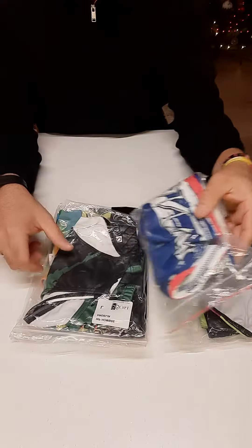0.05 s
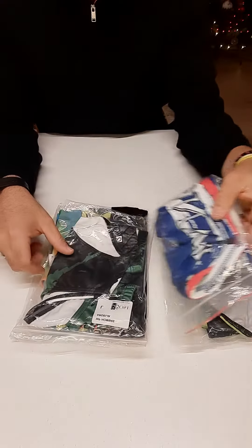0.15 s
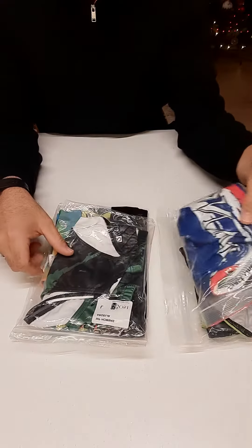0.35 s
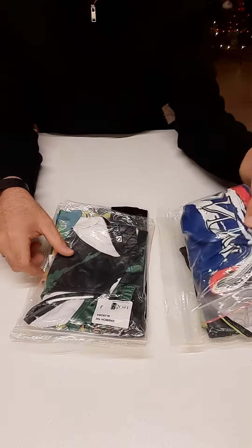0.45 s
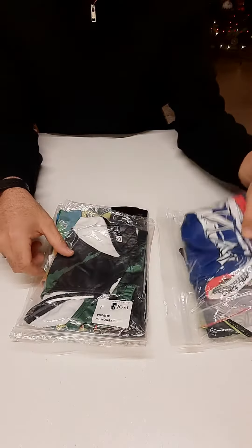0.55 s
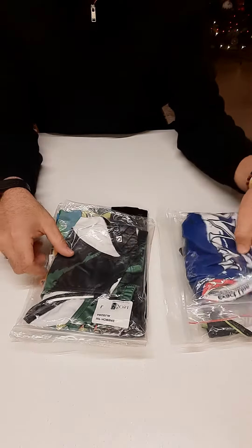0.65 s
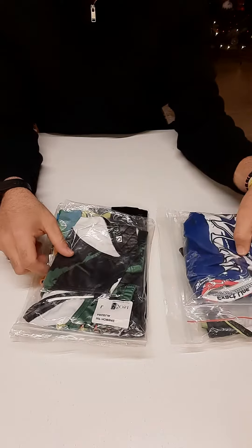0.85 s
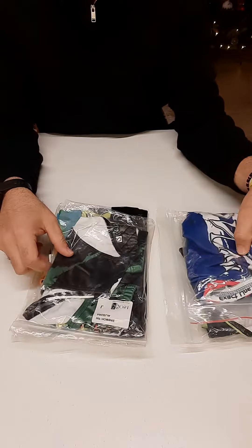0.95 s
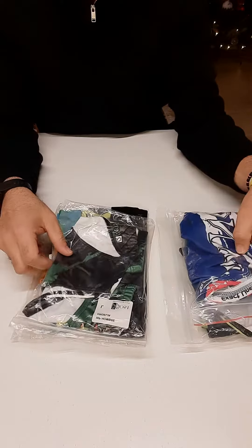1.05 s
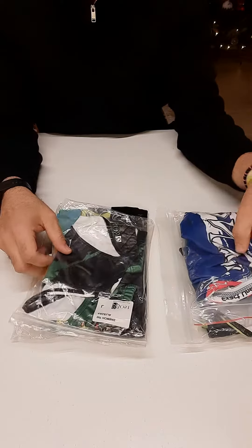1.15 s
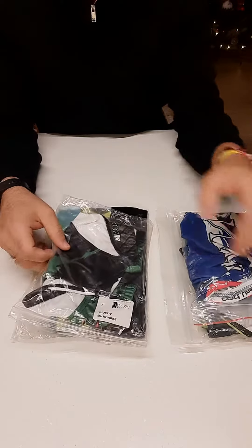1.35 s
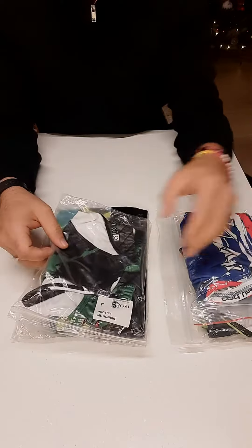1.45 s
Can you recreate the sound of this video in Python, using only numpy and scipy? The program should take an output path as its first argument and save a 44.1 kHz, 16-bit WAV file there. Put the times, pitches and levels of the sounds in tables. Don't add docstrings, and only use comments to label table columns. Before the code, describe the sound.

Plastic packaging rustles, pops and snaps, with one soft thud on a tabletop in a quiet room.

```python
import sys
import numpy as np
from scipy import signal
from scipy.fft import rfft, irfft
from scipy.io import wavfile

SR = 44100
rng = np.random.default_rng(int(sys.argv[2]) if len(sys.argv) > 2 else 0)


def to_wav(sig):
    pcm = np.clip(np.atleast_2d(sig), -1, 1) * 32767
    pcm = np.round(pcm).astype(np.int16)
    wavfile.write(sys.argv[1], SR, pcm.T)


def field_ratio(decibels):
    return 10 ** (np.asarray(decibels, dtype=float) / 20)


N = 66150


def in_time(rows):
    s, *columns = np.transpose(rows)
    return [np.interp(np.arange(N) / SR, s, c) for c in columns]


def at_hz(points, hz):
    table_hz, values = np.transpose(points)
    return np.interp(np.log(hz), np.log(table_hz), values)


def rms_one(x):
    return x / np.sqrt(np.mean(x ** 2) + 1e-20)


def drift(rate_hz):
    r = np.exp(-2 * np.pi * rate_hz / SR)
    noise = rng.standard_normal(N + SR)
    return rms_one(signal.lfilter([1], [1, -2 * r, r * r], noise)[SR:])


def highpass(x, order, hz):
    return signal.sosfilt(signal.butter(order, hz, "high", fs=SR, output="sos"), x)


def ring(clicks, hz, t60_s):
    r = field_ratio(-60 / (t60_s * SR))
    w = 2 * np.pi * hz / SR
    return signal.lfilter([0, np.sin(w)], [1, -2 * r * np.cos(w), r * r], clicks + 1e-18)


def add(out, s, db, sound):
    size = np.abs(sound.mean(0))
    i = max(int(s * SR) - np.argmax(size), 0)
    out[:, i:i + sound.shape[1]] += field_ratio(db) * sound / size.max()


# time in s, peak in dB, pitch in Hz.
POPS_CARRIED = [(0.0329, -48.5, 930), (0.0605, -63, 1201), (0.0867, -43.4, 1280), (0.0992, -46.4, 1880),
                (0.1062, -42.5, 1370), (0.1267, -42.5, 1290), (0.1363, -38.5, 2780), (0.1473, -48.5, 1350),
                (0.165, -46, 1750), (0.1806, -40.5, 2740), (0.2032, -36.9, 2100), (0.2093, -37, 1870),
                (0.2163, -29.5, 2520), (0.2876, -29.5, 2440), (0.2998, -43.8, 2590), (0.3081, -46, 2200),
                (0.3422, -43, 1690), (0.3677, -37.5, 2330), (0.3837, -30, 2206), (0.432, -43.5, 3600),
                (0.4775, -39, 1840)]
POPS_SET_DOWN = [(0.5478, -40, 990), (0.5627, -33.5, 1940), (0.5736, -37, 1000), (0.5881, -37.5, 785),
                 (0.6009, -35, 1060), (0.6093, -35.7, 2600), (0.625, -32.5, 1050), (0.6397, -40, 980),
                 (0.6492, -42, 1010), (0.6577, -23.5, 914), (0.6719, -37, 1220), (0.6868, -34, 1650),
                 (0.7048, -27, 1180), (0.7236, -37, 740), (0.7718, -44, 1240)]
POPS_SECOND_BAG = [(0.8366, -39.5, 1400), (0.8578, -34.5, 3790), (0.9154, -45, 3600), (0.9438, -55, 1540),
                   (0.9685, -46.5, 1160), (0.9933, -39.1, 1610), (1.0037, -37.5, 2340),
                   (1.0061, -33.5, 2210), (1.0507, -44.5, 1600), (1.1053, -42.5, 2310), (1.1198, -40, 770),
                   (1.1292, -44, 2060), (1.1451, -39.5, 2740), (1.163, -40, 1190), (1.1817, -52, 1220),
                   (1.203, -44, 2120), (1.3277, -52.5, 2220), (1.347, -47, 2800), (1.4572, -49.5, 1920),
                   (1.4711, -54, 2970)]
POP_CYCLES, POP_DB, POP_ROUGH_DB, POP_PAN_DB = 3.4, 0.56, -8.5, 4.5


def pops(rows):
    out = np.zeros((2, N + SR))
    t = np.arange(400) / SR
    shakes = rng.standard_normal((len(rows), len(t)))
    for (s, db, hz), shake in zip(rows, shakes):
        push = field_ratio(POP_ROUGH_DB) * shake * np.exp(-t * hz / 2)
        push[:int(SR / hz / 5) + 1] -= 1
        sound = highpass(ring(push, hz, POP_CYCLES / hz), 1, hz / 2)
        pan_db = POP_PAN_DB + shake[-1]
        add(out, s, db + POP_DB, sound * field_ratio(pan_db * np.array([[.5], [-.5]])))
    return out[:, :N]


# time in s, peak in dB, centre in Hz, length in ms.
CRACKS_FIRST_BAG = [(0.0314, -54, 6800, 0.82), (0.0596, -51.5, 6840, 0.25), (0.11, -53.5, 6740, 0.75),
                    (0.131, -49, 6350, 0.81), (0.1477, -56, 6700, 1.0), (0.179, -42, 6700, 0.52),
                    (0.216, -28.5, 10000, 0.27), (0.2873, -45, 6000, 0.3), (0.2949, -47.3, 6640, 0.39),
                    (0.3081, -50, 7220, 0.28), (0.3676, -40.5, 5890, 0.34), (0.3837, -32.5, 6700, 0.21),
                    (0.4321, -41.5, 5000, 0.34), (0.5466, -38, 5840, 0.39), (0.5605, -49, 6500, 0.38),
                    (0.5624, -28.5, 5600, 0.45), (0.6551, -35, 6600, 0.13), (0.657, -20.5, 10540, 0.74),
                    (0.6638, -28.5, 11800, 0.73), (0.6739, -33, 6890, 0.61), (0.6876, -34.5, 6170, 1)]
CRACKS_SECOND_BAG = [(0.8366, -55.5, 6650, 1.7), (0.8577, -44, 4200, 0.93), (0.9146, -49, 5130, 0.37),
                     (0.9332, -48, 5550, 0.23), (0.9685, -48, 5570, 0.42), (0.9781, -57, 6930, 0.45),
                     (0.9927, -44.5, 6640, 1.2), (0.9967, -42.5, 7330, 0.72), (1.0035, -26, 10300, 0.97),
                     (1.1055, -53, 5900, 0.7), (1.1166, -38, 9500, 0.32), (1.1451, -34, 5370, 0.94),
                     (1.2029, -37, 11100, 0.22), (1.3278, -51.5, 6220, 0.45), (1.3472, -45, 9200, 0.41),
                     (1.4572, -50, 6740, 0.16), (1.4711, -45.5, 5300, 0.16)]
CRACK_OCTAVES, CRACK_DB, CRACK_SIDE = .7, 2.57, .6
SCATTER_DB, SCATTER_RISE = -11, 0.95


def cracks(rows):
    out = np.zeros((2, N + SR))
    t = (np.arange(500) - 150) / SR
    noises = rng.standard_normal((len(rows), 3, len(t)))
    for (s, db, hz, ms), noise in zip(rows, noises):
        edges_hz = np.clip(hz * 2 ** (CRACK_OCTAVES * np.array([-1, 1])), 500, .45 * SR)
        band = signal.butter(2, edges_hz, "band", fs=SR, output="sos")
        u = t / (max(ms, .1) / 1000)
        envelope = np.exp(-np.where(u < 0, -u / SCATTER_RISE, u))
        burst = field_ratio(SCATTER_DB) * (noise[0] + CRACK_SIDE * noise[1:]) * envelope
        burst[:, 150] += 1
        add(out, s, db + CRACK_DB, signal.sosfilt(band, burst))
    return out[:, :N]


# time in s, crinkle level in dB, brightness in dB.
HANDLING = [(0.025, -80, -17), (.05, -58, -9), (.12, -61.5, 6), (.2, -57, -6.5), (.4, -60.5, 6),
            (.52, -62, -11.5), (.56, -48, -5), (.645, -38.5, -9), (.665, -45, 8), (.72, -47, -2.5),
            (.79, -56.5, -5.5), (.95, -59, -6), (1.0, -50.5, -1), (1.07, -58, 2), (1.14, -53.5, -5),
            (1.22, -61, 0), (1.3, -73, 4.5), (1.5, -69, 10)]
# frequency in Hz, level in dB.
FILM_SPECTRUM = [(300, -66), (600, 4), (1200, 6), (2500, 6), (5000, 10.5), (9000, -8), (15000, -0.5)]
CRINKLES_PER_S, CRINKLE_CYCLES = 4500, 2.8
CRINKLE_SPREAD_DB, CLUMP_DB = 3.5, 4.0


def crinkles():
    level_db, bright_db = in_time(HANDLING)
    sizes = field_ratio(CRINKLE_SPREAD_DB * np.minimum(rng.exponential(1, N), 3.0)) * rng.choice([-1, 1], N)
    born = rng.random(N) < CRINKLES_PER_S * field_ratio(CLUMP_DB * drift(60)) / SR
    pitches_hz = np.geomspace(330, 15000, 24)
    dealt = rng.integers(0, 24, N)
    sides = 1 + .5 * rng.normal(0, 1, N) * np.array([[1], [-1]])
    clicks = sides * sizes * born
    out = 0
    for k, hz in enumerate(pitches_hz):
        tilt_db = bright_db * np.clip(np.log2(hz / 1500) / 2, 0, 1)
        gain = field_ratio(at_hz(FILM_SPECTRUM, hz) + tilt_db) * np.sqrt(hz / 1000)
        out = out + gain * ring(clicks * (dealt == k), hz, CRINKLE_CYCLES / hz)
    return field_ratio(level_db) * rms_one(out)


# frequency in Hz, level in dB, t60 in s.
TABLE_MODES = [(68.8, -2.5, 1), (92.6, -8.5, 1), (146, 6.5, 0.245), (287, -4, 0.2), (296, 4, 0.16),
               (535, 4, 0.21)]
THUD_S, THUD_DB = .657, -53


def thud():
    push = np.zeros(N)
    i = int(THUD_S * SR)
    push[i:i + 100] = np.hanning(100) / 50
    hum = sum(field_ratio(db) * ring(push, hz, t60_s) for hz, db, t60_s in TABLE_MODES)
    return field_ratio(THUD_DB) * highpass(hum, 2, 60)


# frequency in Hz, left-right likeness from 0 to 1.
LIKENESS = [(60, 0.87), (300, 0.89), (640, 0.33), (1400, 0.067), (6000, 0.02)]


def diffuse(size, spectrum):
    hz = np.maximum(np.fft.rfftfreq(size, 1 / SR), 1)
    mid, side = rfft(rng.standard_normal((2, size)))
    alike = np.clip(at_hz(LIKENESS, hz), 0, 1)
    both = np.sqrt(1 + alike) * mid + np.sqrt(1 - alike) * side * np.array([[1], [-1]])
    return hz, both * field_ratio(at_hz(spectrum, hz))


# frequency in Hz, t60 in s.
ROOM_T60 = [(200, 0.27), (1300, 0.44), (3500, 0.47), (9000, 0.41), (16000, 0.35)]
ROOM_DB, ROOM_RISE_S = -4, 0.0041


def room(x):
    t = np.arange(SR) / SR
    hz, both = diffuse(SR, [(20, 0), (20000, 0)])
    tail = 0
    for centre_hz in 40 * 2. ** np.arange(10):
        share = np.clip(1 - np.abs(np.log2(hz / centre_hz)), 0, 1)
        tail = tail + irfft(both * share, SR) * field_ratio(-60 * t / at_hz(ROOM_T60, centre_hz))
    tail = tail * np.clip(t / ROOM_RISE_S, 0, 1)
    tail = tail / np.sqrt(np.sum(tail[0] ** 2))
    return field_ratio(ROOM_DB) * signal.fftconvolve(x[None], tail, axes=1)[:, :N]


# frequency in Hz, density in dB per Hz.
AIR_SPECTRUM = [(25, -24), (45, 11), (70, 7.5), (190, 8.5), (260, -5.5), (700, -15.5), (3000, -21),
                (16000, -19.5)]
AIR_DB = -67.5
# frequency in Hz, level in dB, width in Hz.
HUMS = [(54, -89, 16), (71, -90.5, 19), (93, -82, 4.7), (139, -91.5, 5.9)]


def air():
    hz, both = diffuse(N, AIR_SPECTRUM)
    out = field_ratio(AIR_DB) * rms_one(irfft(both, N))
    for centre_hz, db, width_hz in HUMS:
        resonance = 1 + (2 * (hz - centre_hz) / width_hz) ** 2
        out = out + field_ratio(db) * rms_one(irfft(both / resonance, N))
    return out


LEFT_LAG_S, FILM_CUT_HZ = .00005, 230


def scene():
    film = pops(POPS_CARRIED) + pops(POPS_SET_DOWN) + pops(POPS_SECOND_BAG) + crinkles()
    film[0] = np.roll(film[0], int(round(LEFT_LAG_S * SR)))
    film = film + cracks(CRACKS_FIRST_BAG) + cracks(CRACKS_SECOND_BAG)
    film = highpass(film, 2, FILM_CUT_HZ)
    table = thud()
    return film + table + room(film.mean(0) + table) + air()


def roll_off(x):
    return signal.sosfilt(signal.butter(12, 17840, fs=SR, output="sos"), x)


TOP_HZ, TOP_DB = 15900, -24
RUMBLE_CUT_HZ, CUTOFF_HZ = 39, 16800


def record(dry):
    hz = np.fft.rfftfreq(N, 1 / SR)
    top_step = field_ratio(TOP_DB * np.clip((hz - TOP_HZ) / 100, 0, 1))
    x = irfft(rfft(dry) * top_step, N)
    x = highpass(x, 2, RUMBLE_CUT_HZ)
    x = signal.sosfilt(signal.cheby2(10, 60, CUTOFF_HZ * 1.04, fs=SR, output="sos"), x)
    return roll_off(x)


dry = scene()
out = record(dry)
to_wav(out)
```